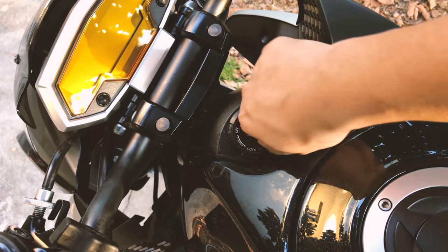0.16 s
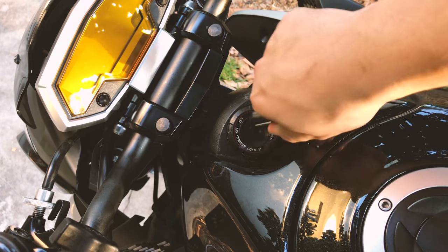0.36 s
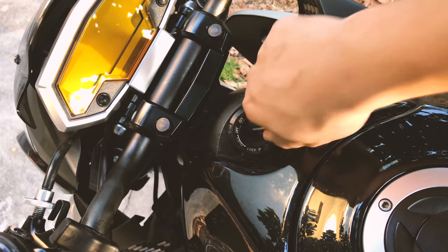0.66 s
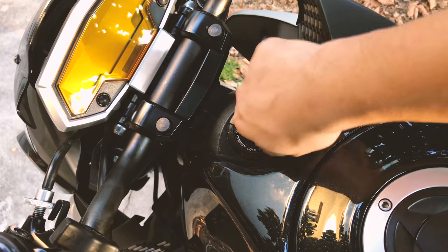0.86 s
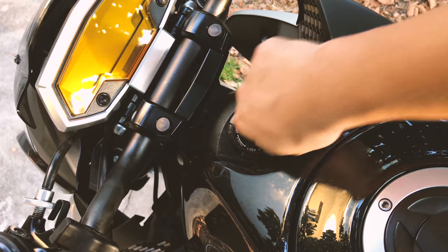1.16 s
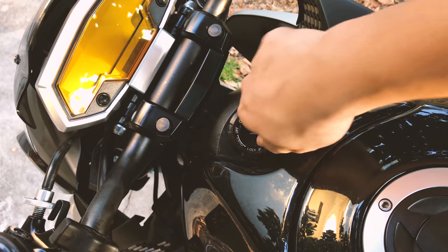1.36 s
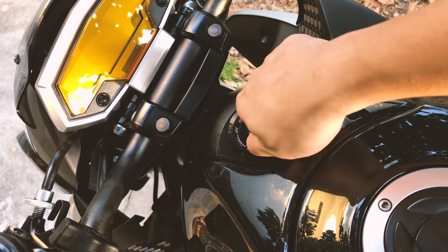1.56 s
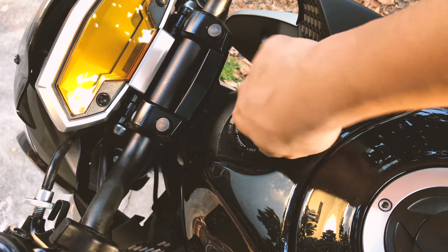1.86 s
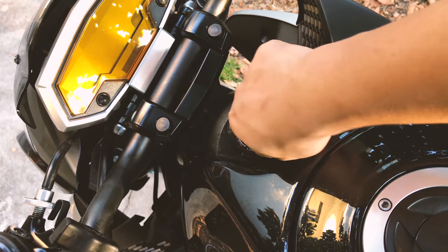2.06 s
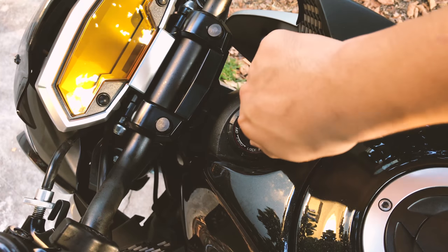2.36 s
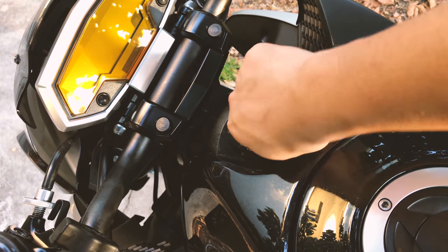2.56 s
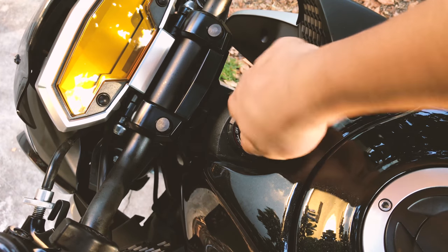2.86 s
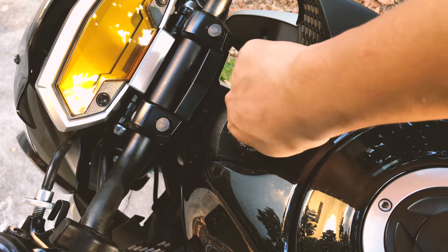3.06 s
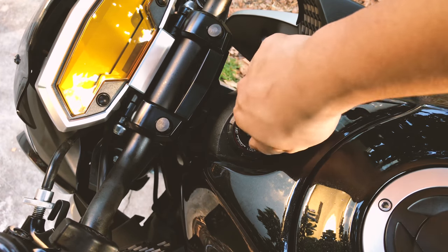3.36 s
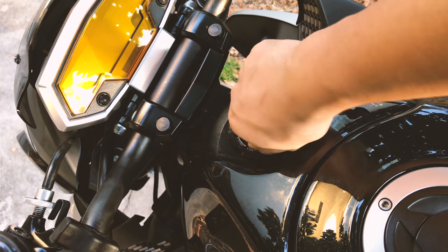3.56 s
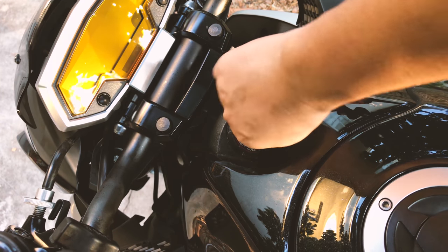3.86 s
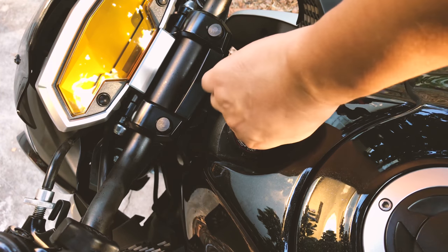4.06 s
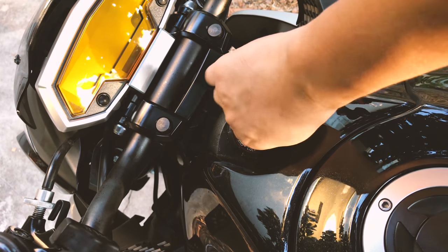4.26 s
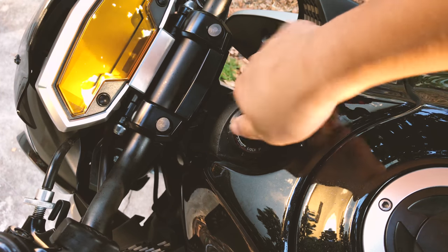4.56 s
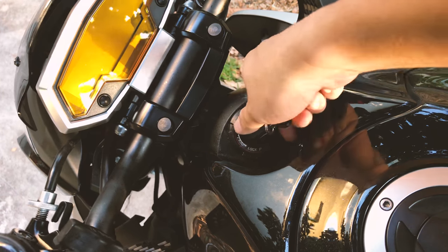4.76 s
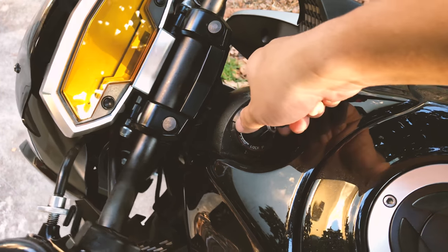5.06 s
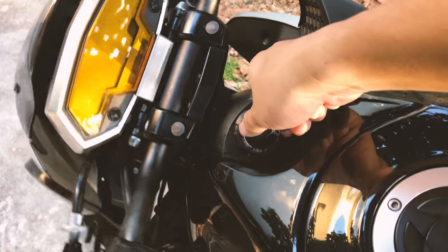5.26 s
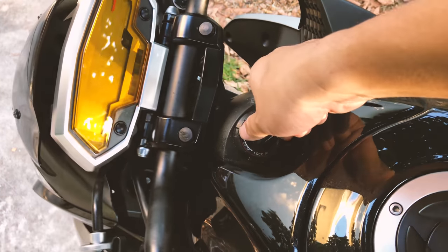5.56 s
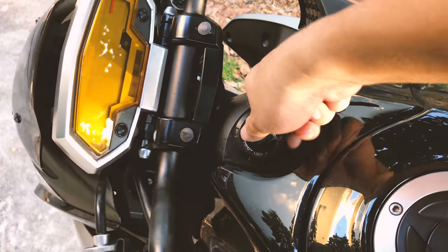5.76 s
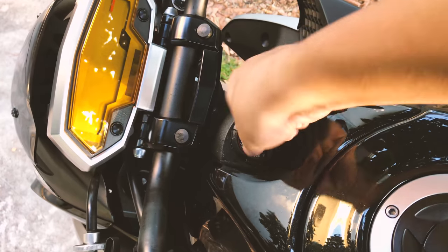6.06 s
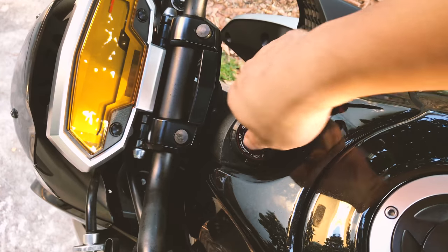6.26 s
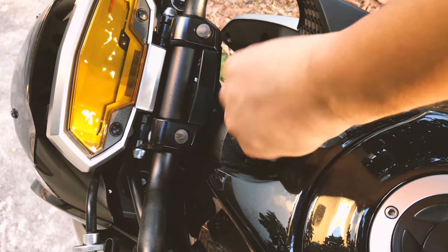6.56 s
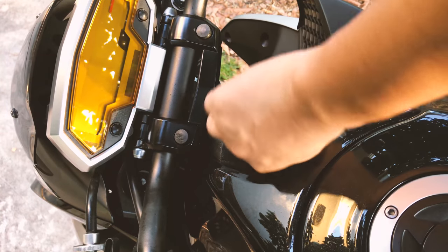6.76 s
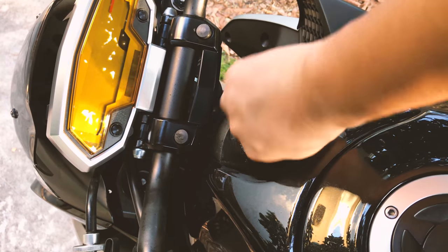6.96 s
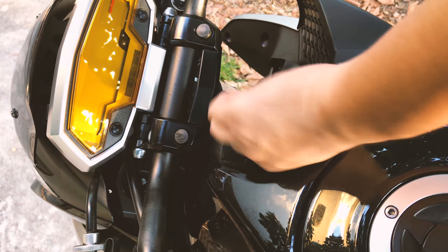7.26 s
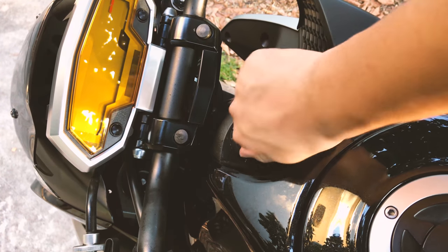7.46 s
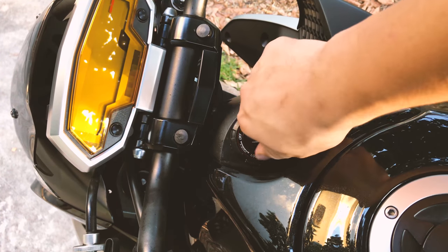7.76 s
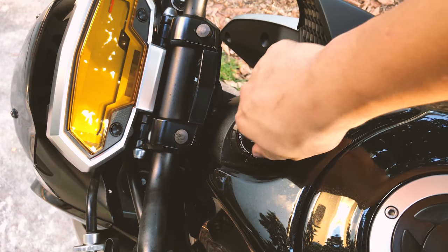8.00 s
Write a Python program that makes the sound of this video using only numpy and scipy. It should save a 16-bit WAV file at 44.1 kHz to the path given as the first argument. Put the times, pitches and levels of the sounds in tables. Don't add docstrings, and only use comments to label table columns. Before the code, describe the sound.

Outdoors beside a road, with the microphone close to a motorcycle's ignition lock. From 0 to 1.5 s a stiff key is jiggled hard: rapid bright metallic ticks, short gritty scrapes and clunks, strongest near 0.55, 0.9 and 1.2 s, with small dull body knocks. Slower tries follow from 1.75 s, ending in a clunk at 2.55 s that leaves a soft hollow tank ring. A thin, very faint squeak glides down around 2.6-3.3 s. Then only isolated clicks, one at 3.5 s; a distant engine drones low, strongest near 4.5 s, when the key ring ticks brightly. At 5.2-5.5 s the handlebar judders in seven quick thumps and rattles. Another faint squeak follows near 5.6-6.1 s. Clicks come at 6.1 and 6.9 s, with a strong double clack at 7.5 s. A car's tyre roar grows throughout, peaks around 7 s over a low, sinking engine hum, then eases slightly by 8 s.

```python
import sys
import numpy as np
from scipy import signal
from scipy.io import wavfile
from scipy.ndimage import uniform_filter1d

SR = 44100
rng = np.random.default_rng(int(sys.argv[2]) if len(sys.argv) > 2 else 0)


def dump_mix(stems):
    frames = np.atleast_2d(stems).T
    limited = np.clip(frames, -1, 1)
    pcm = np.round(limited * 32767).astype(np.int16)
    wavfile.write(sys.argv[1], SR, pcm)


def linear_from_db(decibels):
    return 10 ** (np.asarray(decibels, float) / 20)


N = 358533

# (frequency [Hz], level [dB], decay time t60 [s])
BARREL_MODES = [(1122, -0.5, 0.0063), (1417, -2.5, 0.039), (1870, 8.5, 0.0066), (2560, 5, 0.0054),
                (2800, 0, 0.018), (3200, 1.5, 0.013), (3670, 5.5, 0.0069), (4160, 1.5, 0.012),
                (4580, 6.5, 0.0072), (5480, 4, 0.0065)]
# (frequency [Hz], level [dB], decay time t60 [s])
PIN_MODES = [(6290, -2.5, 0.0056), (6870, 8, 0.0014), (8780, 8, 0.0017), (10000, -10, 0.0017),
             (11260, -2.5, 0.0053), (12520, 4, 0.0023), (13800, -9, 0.00254), (15100, -2, 0.005)]
BODY_SCATTER_DB = 3.0


def rms_one(x):
    return x / np.sqrt(np.mean(x ** 2) + 1e-20)


def in_time(rows):
    s, *columns = np.transpose(rows)
    return [np.interp(np.arange(N) / SR, s, column) for column in columns]


def during(rows):
    t = np.arange(N) / SR
    return np.clip(np.minimum(t - rows[0][0], rows[-1][0] - t) * 50, 0, 1)


def at_hz(points, hz):
    point_hz, point_db = np.transpose(points)
    return np.interp(np.log(hz), np.log(point_hz), point_db)


def drift(rate):
    pole = np.exp(-80 * np.pi * rate / SR)
    chance = rng.standard_normal(N // 40 + 2002)
    slow = signal.lfilter([1], [1, -2 * pole, pole * pole], chance)[2000:]
    return np.interp(np.arange(N) / 40, np.arange(len(slow)), rms_one(slow))


def ring(force, hz, t60):
    r, w = linear_from_db(-60 / (t60 * SR)), 2 * np.pi * hz / SR
    return signal.lfilter([0, np.sin(w)], [1, -2 * r * np.cos(w), r * r], force + 1e-18)


def strike(times, level_db, modes, chatter_s, chatter_db, scatter_db, rub=0, centre_hz=None, focus_db=0):
    at = np.round(np.asarray(times) * SR).astype(int)
    luck = rng.standard_normal((len(at), 2, len(modes)))
    keep = np.exp(-1 / (max(chatter_s, 1e-4) * SR))
    out = np.zeros(N)
    shiver = rng.standard_normal(N)
    for k, (hz, mode_db, t60) in enumerate(modes):
        octaves = 0 if centre_hz is None else np.minimum(np.abs(np.log2(hz / centre_hz)), 1)
        blow_db = level_db + scatter_db * luck[:, 0, k] - focus_db * octaves
        blows = np.zeros(N)
        blows[at] = linear_from_db(blow_db) * np.sign(luck[:, 1, k])
        chatter = signal.lfilter([np.sqrt(1 - keep ** 2)], [1, -keep], blows + 1e-18)
        force = blows + (linear_from_db(chatter_db) * chatter + rub) * shiver
        out += linear_from_db(mode_db) * ring(force, hz, t60)
    return out


def bands():
    edges = 36 * 2 ** np.arange(0, 9.1, 1 / 3)
    white = rng.standard_normal((2, N))
    for k, (low, high) in enumerate(zip(edges, edges[1:])):
        sos = signal.butter(2, [low, high], "band", fs=SR, output="sos")
        yield np.sqrt(low * high), sos, signal.sosfilt(sos, white[k % 2])


def tone(rows, orders=((1, 0),), wobble_db=0.0, rate=6.5):
    hz, level_db = in_time(rows)
    phase = 2 * np.pi * np.cumsum(hz) / SR
    harmonics = 0
    for k, order_db in orders:
        harmonics = harmonics + linear_from_db(order_db + wobble_db * drift(rate)) * np.sin(k * phase)
    return np.sqrt(2) * during(rows) * linear_from_db(level_db) * harmonics


def car():
    # (time [s], level [dB])
    approach = [(0, -17.5), (1.6, -14.5), (3.0, -11.5), (3.598, -10.5), (4.6, -7.5), (5.7, -3), (6.3, -0.5),
                (7.0, 0), (7.601, -1.5), (8.13, -2.5)]
    # (far traffic [dB], car at its closest [dB], share of the approach [ratio], lag [s])
    layers = [
        (-50.5, -47, 0.48, 1),
        (-60.5, -40.5, 1.75, 0.24),
        (-76, -40, 1.304, 0.0),
        (-72, -53.5, 2.5, 0.12),
    ]
    # (frequency [Hz], level [dB per Hz])
    far_spectrum = [(40, -7), (96, 1.5), (167, -15), (290, -22), (580, -25), (965, -27.5), (1180, -25.5),
                    (1630, -23.5), (2100, -31), (3000, -43), (5000, -48), (16000, -60.5)]
    # (frequency [Hz], level [dB per Hz])
    close_spectrum = [(24, -32), (40, -23), (77, -6), (109, -14), (140, -10), (372, -13.5), (896, 0),
                      (1180, -9), (1630, -9), (3300, -18.5), (14800, -66), (16000, -54)]
    # (frequency [Hz], width [Hz], lift [dB])
    tread = [(925, 134, 7.5), (1500, 116, 2.5)]
    s, gain_db = np.transpose(approach)
    levels = []
    for far_db, close_db, share, lag in layers:
        car_db = close_db + share * np.interp(np.arange(N) / SR - lag, s, gain_db)
        levels.append(10 * np.log10(linear_from_db(2 * far_db) + linear_from_db(2 * car_db)))
    near = np.clip((levels[2] - levels[2].min() - 12.0) / 23.6, 0, 1)
    parts, together = np.zeros((4, N)), drift(3.0)
    for hz, _, noise in bands():
        colour_db = (1 - near) * at_hz(far_spectrum, hz) + near * at_hz(close_spectrum, hz)
        layer = np.searchsorted([180, 700, 2600], hz)
        parts[layer] += linear_from_db(colour_db + 0.24 * together + 0.83 * drift(8.3)) * noise
    out = 0
    for part, level_db in zip(parts, levels):
        loudness = np.sqrt(uniform_filter1d(part ** 2, size=SR, mode="reflect"))
        out = out + linear_from_db(level_db - 2.0) * part / loudness
    for hz, width_hz, lift_db in tread:
        out = out + (linear_from_db(lift_db) - 1) * signal.lfilter(*signal.iirpeak(hz, hz / width_hz, SR), out)
    return out


def engines():
    # (time [s], frequency [Hz], level [dB])
    drone = [
        (1.5, 100.5, -67.5),
        (3.1, 97.95, -52.5),
        (4.5, 96.45, -48),
        (5.3, 98.2, -51.5),
        (6.1, 96.7, -55),
    ]
    # (time [s], frequency [Hz], level [dB])
    firing = [
        (4.0, 48.4, -64),
        (4.7, 46.45, -58),
        (6.2, 44.3, -52),
        (6.8, 43.07, -51),
        (7.6, 41.66, -43),
        (8.13, 41, -50.5),
    ]
    # (multiple [ratio], level [dB])
    firing_orders = [(1, 1.5), (2, -4.5), (4, -10), (6, -5.5)]
    far = tone(drone, ((1, 2.5), (2, -22.0)), wobble_db=0.5)
    return far + tone(firing, firing_orders, wobble_db=1.5)


def squeaks():
    # (time [s], frequency [Hz], level [dB])
    glides = [
        [(2.60, 11000, -88), (2.635, 10300, -77), (2.684, 9600, -90), (2.745, 10300, -80), (2.775, 10300, -81),
         (2.83, 9100, -81), (2.885, 9480, -83), (2.93, 9330, -84), (2.996, 8200, -87), (3.15, 7450, -90),
         (3.3, 6500, -91)],
        [(5.57, 9700, -86), (5.595, 10400, -82), (5.63, 9900, -82), (5.67, 10200, -84), (5.72, 9700, -92),
         (5.78, 10500, -82), (5.81, 10050, -79), (5.85, 10900, -80), (5.89, 11350, -80), (5.93, 10900, -81),
         (5.97, 9700, -81), (6.09, 8700, -80)],
        [(5.845, 12200, -86), (5.88, 12600, -82), (5.92, 12350, -82), (5.945, 11900, -86)],
    ]
    return linear_from_db(1.5) * sum(tone(rows, wobble_db=4.5, rate=14.0) for rows in glides)


def tank():
    # (time [s], level [dB], frequency [Hz], decay time t60 [s])
    tank_ring = (2.55, -41.5, 388, .55)
    s, level_db, hz, t60 = tank_ring
    blow = np.zeros(N)
    blow[round(s * SR)] = linear_from_db(level_db)
    return ring(blow, hz, t60)


def steering():
    # (time [s], barrel [dB], tick [dB], thud [dB])
    jerks = [
        (5.179, -29, -46, -26),
        (5.267, -34, -44.5, -30.5),
        (5.303, -37, -43.5, -29),
        (5.349, -35, -44, -29.5),
        (5.395, -37, -45, -31),
        (5.434, -29, -43.5, -30),
        (5.531, -27.5, -42, -27),
    ]
    # (frequency [Hz], level [dB], decay time t60 [s])
    fork_modes = [(108.5, 3, 0.083), (151, 0, 0.063), (205, 3, 0.025), (337, 1, 0.049), (411.5, 0, 0.055),
                  (695, 4.5, 0.016), (990, -5, .015), (1327, -1.5, 0.033), (1730, 4, 0.0063),
                  (2300, -1.5, 0.0046)]
    s, barrel_db, pin_db, thud_db = np.transpose(jerks)
    fork = strike(s + .006, thud_db - 7.5, fork_modes, chatter_s=0.0091, chatter_db=-2.0, scatter_db=3.0)
    barrel = strike(s, barrel_db - 22.5, BARREL_MODES, chatter_s=0.0083, chatter_db=13.0,
                    scatter_db=BODY_SCATTER_DB, centre_hz=3700, focus_db=28.0)
    pins = strike(s, pin_db - 16.5, PIN_MODES, chatter_s=0.023, chatter_db=15.5, scatter_db=BODY_SCATTER_DB)
    return fork + barrel + pins


def key_ring():
    # (time [s], level [dB])
    hits = [
        (4.546, -43),
        (4.552, -37),
        (4.557, -53),
        (4.565, -48),
        (4.58, -48),
    ]
    # (frequency [Hz], level [dB], decay time t60 [s])
    ring_modes = [(4170, 0, 0.019), (8150, -3.5, .02), (11150, -3, 0.036), (11630, -5, 0.14),
                  (12300, -1, 0.061), (13900, -6, .03), (15200, 3, 0.02)]
    s, hit_db = np.transpose(hits)
    return strike(s, hit_db - 8.5, ring_modes, chatter_s=0.007, chatter_db=5.0, scatter_db=BODY_SCATTER_DB)


def contacts():
    # (time [s], centre of ring [Hz], barrel ring [dB], tick [dB], body thud [dB])
    clunks = [(0.164, 3260, -26, -32, -28.5), (0.1836, 4100, -27.5, -24, -23.5),
              (0.1935, 4460, -28, -31, -31.5), (0.2146, 4440, -23, -40, -40),
              (0.2918, 4360, -30.5, -43, -30), (0.533, 2100, -50, -39, -30),
              (0.5446, 4770, -17, -29, -29.5), (0.5494, 1500, -22.5, -36, -53),
              (0.5654, 2800, -17, -33, -29.5), (0.65, 2000, -36, -53, -35), (0.8528, 3590, -47, -43.5, -36),
              (0.8754, 4660, -13.5, -16, -23), (0.8937, 1500, -26, -43, -35.5),
              (0.9118, 2400, -19.5, -31, -36.5), (0.9839, 4570, -29.5, -39, -32),
              (1.178, 3200, -27, -36, -31.5), (1.1928, 4450, -16.5, -16.5, -26),
              (1.2005, 1920, -20.5, -35, -48), (1.2186, 1500, -20, -25.5, -30),
              (1.2286, 2300, -19.5, -28, -30.5), (1.9956, 3030, -22, -37, -37),
              (2.5168, 5000, -24.5, -31, -26.5), (2.532, 1600, -20, -31.5, -37),
              (2.5461, 3700, -35, -34, -31)]
    # (time [s],
    # centre of ring [Hz], barrel ring [dB], tick [dB])
    light_clicks = [(.0488, 2500, -59, -66), (.0912, 6000, -54, -54), (0.1081, 4740, -50, -46),
                    (0.1322, 6500, -51, -41), (0.157, 4640, -42, -44), (0.2065, 4000, -38, -45),
                    (0.334, 4280, -33, -47), (0.3489, 4700, -46, -43), (0.369, 2140, -47, -46),
                    (0.5168, 6350, -31.5, -32.5), (0.5282, 3500, -37, -39), (0.54, 1390, -23, -31),
                    (0.688, 2600, -34, -40), (0.7027, 4900, -34, -33), (0.7165, 3500, -35, -40),
                    (0.7478, 3700, -37, -32), (0.7579, 1500, -43, -40), (0.8028, 2590, -43, -42),
                    (0.8291, 2600, -29.5, -40), (0.8462, 3200, -43, -38), (1.0118, 4700, -46, -42),
                    (1.028, 3530, -38, -68), (1.0418, 4800, -33, -41), (1.0554, 6500, -39, -37),
                    (1.1344, 2200, -39.5, -46), (1.1438, 2800, -34.5, -35), (1.1627, 6440, -75, -30),
                    (1.3679, 2150, -33, -51), (1.414, 2000, -43, -47), (1.4353, 2850, -31, -41),
                    (1.4512, 4700, -50, -53), (1.4677, 6500, -44, -44),
                    (1.7567, 3400, -44.5, -54), (1.7975, 1600, -59, -52), (1.9382, 4100, -43, -49),
                   (1.9555, 2600, -39.5, -39), (1.967, 5430, -29.5, -39), (1.9733, 1710, -37, -45),
                   (1.9844, 1400, -32.5, -54), (2.292, 1300, -37.5, -49.5), (2.309, 3000, -41, -51),
                   (2.328, 3460, -39, -36), (2.338, 2700, -42, -44), (2.35, 3300, -43, -42),
                   (2.4608, 3800, -43, -48), (2.4868, 6500, -36, -41), (2.495, 6500, -42, -44),
                   (2.51, 3700, -40, -40), (2.5607, 1590, -23.5, -38), (2.715, 1800, -49, -52),
                   (2.7232, 3580, -48, -68),
                    (0.1149, 4400, -44.5, -42), (0.1404, 3800, -49, -43), (0.15, 4300, -36.5, -41),
             (0.1726, 4300, -25, -44), (0.2855, 2900, -35, -50), (0.3057, 4100, -51, -38),
             (0.3116, 4500, -53, -51), (0.3164, 6400, -43, -45), (0.3441, 3700, -41, -45),
             (0.3648, 3700, -37.5, -44), (0.3739, 2700, -48, -49), (0.4668, 5000, -51, -61),
             (0.4906, 3600, -43, -43), (0.5067, 4800, -41, -40), (0.5235, 3200, -43, -38.5),
             (0.5355, 2000, -30, -35), (0.6609, 1900, -48, -53), (0.6777, 1900, -41, -39),
             (0.6978, 3500, -45.5, -37), (0.7241, 6500, -46.5, -39), (0.7368, 5000, -47, -49),
             (0.7638, 2000, -36, -39.5), (0.7729, 3600, -38.5, -48), (0.7792, 1900, -53.5, -58),
             (0.8169, 6500, -53.5, -49.5), (0.8591, 2000, -32, -39), (0.8692, 2800, -28, -34.5),
             (0.8827, 3200, -31.5, -34.5), (0.9617, 1900, -58, -51), (0.9951, 1800, -41, -50),
             (1.0349, 3600, -46, -36.5), (1.0648, 3600, -49, -43), (1.0957, 1900, -44, -47),
             (1.1186, 1900, -68, -54), (1.1702, 3300, -44, -37), (1.1838, 1900, -29, -38),
             (1.2048, 2800, -25, -37), (1.2342, 1900, -32, -42), (1.3522, 1800, -49, -59),
             (1.3852, 1800, -49, -58), (1.7394, 2000, -51, -60), (1.8961, 1800, -58, -58),
             (1.9523, 2700, -46, -51), (2.3629, 1800, -58, -49), (2.3809, 2000, -60, -59),
             (2.4211, 1800, -51, -54), (2.5373, 1900, -23.5, -40), (2.5527, 1800, -35, -47),
             (2.6783, 1900, -56, -61), (2.6926, 1800, -54, -60)]
    light = np.array(light_clicks)
    thud_db = light[:, 2] - 7.0 - 1.0 * np.log2(light[:, 1] / 3000)
    return np.vstack([clunks, np.column_stack([light, thud_db])])


def pressure_db():
    # (full pressure at [s], held [s], scrape [dB])
    strokes = [(.0, 0.037, -67), (0.086, .04, -65), (.17, 0.019, -48.5), (.31, 0.098, -57),
               (0.491, 0.063, -58.5), (0.679, 0.068, -56), (0.864, 0.017, -45), (1.019, 0.068, -57.5),
               (1.19, 0.014, -51), (1.3, 0.295, -67.5), (3.72, 0.14, -83), (1.971, 0.013, -59),
               (2.34, 0.038, -61), (2.529, 0.01, -48.5), (4.58, .38, -70.5)]
    press_db_per_s, ease_db_per_s = 340.5, 599
    t = np.arange(N) / SR
    presses = []
    for s, held, db in strokes:
        rise_db = press_db_per_s * np.maximum(s - t, 0)
        fall_db = ease_db_per_s * np.maximum(t - s - held, 0)
        presses.append(db - rise_db - fall_db)
    return np.max(presses, axis=0)


def key_grit():
    catches_per_s = 600
    sizes = linear_from_db(2.5 * np.minimum(rng.exponential(1, N), 4))
    catches = sizes * (rng.random(N) < catches_per_s / SR)
    return linear_from_db(pressure_db()) * (1 + 1.3 * signal.lfilter([1], [1, -.96], catches))


def lock():
    # (time [s], centre of ring [Hz], barrel ring [dB], tick [dB])
    turning = [(3.01, 4700, -46, -34.5), (3.071, 2160, -50, -51), (3.528, 4930, -35.5, -43),
               (3.542, 3300, -25.5, -40), (3.8712, 3900, -41.5, -58), (3.9981, 2600, -44.5, -55.5),
               (4.548, 4260, -47, -39), (4.5805, 6500, -47, -39), (4.6545, 3400, -47, -49),
               (5.0197, 2200, -46, -50), (5.68, 2220, -42.5, -52), (5.74, 3700, -58, -55),
               (5.757, 4300, -57, -42.5), (6.118, 3420, -31, -31.5), (6.2602, 4250, -70.5, -36.5),
               (6.6364, 4403, -54, -41), (6.6545, 4460, -49, -44), (6.8123, 5400, -74, -38),
               (6.818, 3300, -26.5, -50), (6.833, 5850, -44, -44), (6.872, 2560, -38, -62),
               (6.9017, 3070, -28, -37), (6.9075, 4400, -36, -26), (6.9157, 5050, -37, -47),
               (7.135, 2314, -38, -47), (7.1547, 5200, -36.5, -37), (7.3976, 5600, -39, -54),
               (7.474, 2300, -17.5, -26), (7.482, 3370, -30, -27), (7.594, 5630, -33.5, -25)]
    # (time [s], centre of ring [Hz], barrel ring [dB], tick [dB])
    faint = [(3.7466, 3500, -53, -63), (4.0267, 5400, -53, -65), (4.4748, 4500, -59, -55),
             (4.895, 5430, -55, -52), (4.9713, 5400, -70, -57), (5.0097, 5000, -54, -58),
             (5.1515, 4950, -55, -57), (5.73, 3000, -44, -59), (6.1011, 4940, -56, -79),
             (6.114, 5400, -55, -38), (6.1218, 2600, -33, -36), (6.3128, 5400, -65, -54),
             (6.5756, 5400, -65, -55), (7.3476, 5400, -55, -55), (7.489, 3100, -41, -36),
             (7.5793, 5400, -61, -58), (7.6402, 5400, -59, -53), (7.7772, 5400, -65, -54)]
    # (time [s], centre [Hz], level [dB])
    body_knocks = [(.03, 390, -50.5), (.345, 650, -35.5), (.862, 400, -27), (1.369, 500, -34),
                   (1.034, 270, -36), (1.958, 390, -35), (2.21, 660, -43.5), (2.30, 640, -36),
                   (2.331, 300, -39.5), (2.734, 635, -36.5), (3.542, 600, -37.5), (3.872, 400, -39.5),
                   (6.12, 640, -35), (6.908, 644, -28), (7.474, 640, -28.5)]
    # (frequency [Hz], level [dB], decay time t60 [s])
    body_modes = [(204, -3, 0.045), (251.7, 7, 0.075), (344, 2, 0.051), (400, 3, 0.074), (520, -8, 0.07),
                  (635, 6, 0.052), (704, -1.5, 0.053), (860, -0.5, .03), (1006, 1.5, 0.02)]
    worked = contacts()
    s, centre_hz, barrel_db, pin_db = np.vstack([worked[:, :4], turning, faint]).T
    grit = key_grit()
    barrel = strike(s, barrel_db - 10.5, BARREL_MODES, chatter_s=.0022, chatter_db=4.0, scatter_db=0.0,
                    rub=grit * linear_from_db(-32.5), centre_hz=centre_hz, focus_db=9.0)
    light = np.clip((pin_db - barrel_db + 9.5) / 20.0, 0, 1)
    pins = strike(s, pin_db - 8.5, PIN_MODES, chatter_s=.0016, chatter_db=6.5, scatter_db=3.5,
                  rub=grit * linear_from_db(-25.5), centre_hz=7500 * 2 ** (0.92 * light), focus_db=5.5)
    body = strike(worked[:, 0] + .002, worked[:, 4] - 12.5, body_modes, chatter_s=0.0021, chatter_db=0.0,
                  scatter_db=BODY_SCATTER_DB, rub=grit * linear_from_db(-36.5))
    knock_s, knock_hz, knock_db = np.transpose(body_knocks)
    knocks = strike(knock_s + .002, knock_db - 9.0, body_modes, chatter_s=0.0043, chatter_db=-10.5,
                    scatter_db=-0.5, centre_hz=knock_hz, focus_db=4.5)
    no_bass = signal.butter(2, 170, "high", fs=SR, output="sos")
    return signal.sosfilt(no_bass, barrel + pins + body + knocks)


def surrounds(near):
    # (frequency [Hz], level [dB])
    wash = [(300, -20.5), (1500, -23.5), (3500, -22), (7000, -25.5), (14000, -27.5)]
    out = np.zeros(N)
    for hz, sos, noise in bands():
        t60 = .16 * (hz / 3000) ** -.1
        keep = linear_from_db(-120 / (SR * t60))
        power = signal.lfilter([1 - keep], [1, -keep], signal.sosfilt(sos, near) ** 2)
        out += linear_from_db(at_hz(wash, hz) + 14.0) * rms_one(noise) * np.sqrt(power + 1e-18)
    return out


def scene():
    near = lock() + steering() + key_ring()
    background = car() + engines() + squeaks()
    return (near + surrounds(near) + tank() + background)[None, :]


def low_pass(x):
    return signal.sosfilt(signal.butter(12, 16850, fs=SR, output="sos"), x)


def record(dry):
    hiss = linear_from_db(-75.5) * rng.standard_normal(N)
    cut = signal.sosfilt(signal.butter(8, 36, "high", fs=SR, output="sos"), dry + hiss)
    cut = signal.sosfilt(signal.cheby2(10, 60, 16900, fs=SR, output="sos"), cut)
    return low_pass(cut)


dry = scene()
out = record(dry)
dump_mix(out)
```